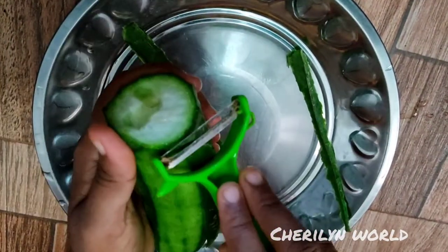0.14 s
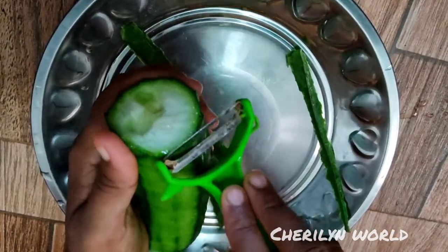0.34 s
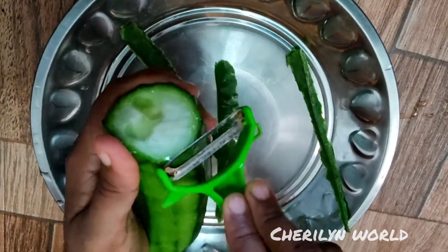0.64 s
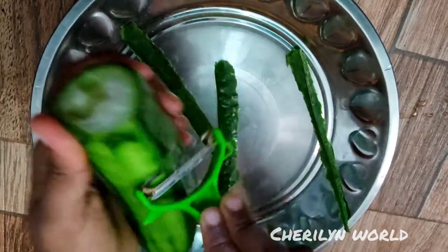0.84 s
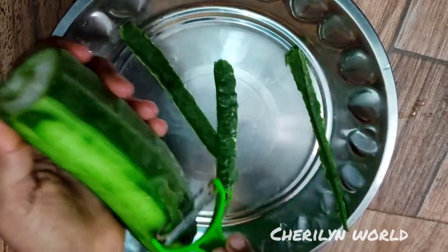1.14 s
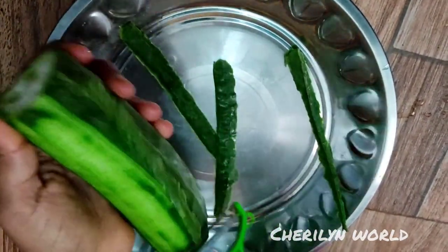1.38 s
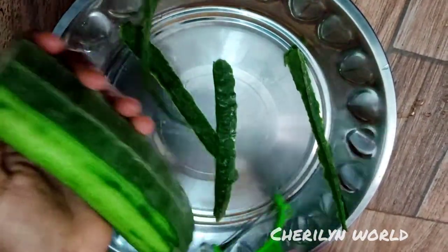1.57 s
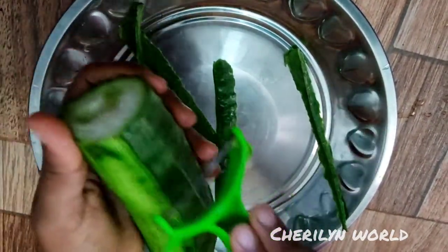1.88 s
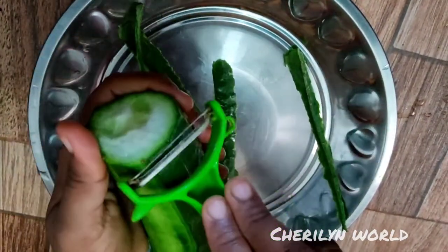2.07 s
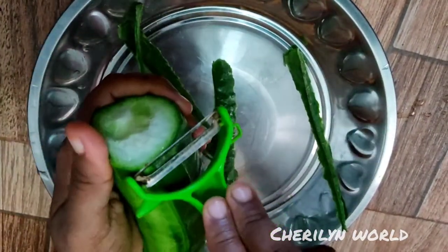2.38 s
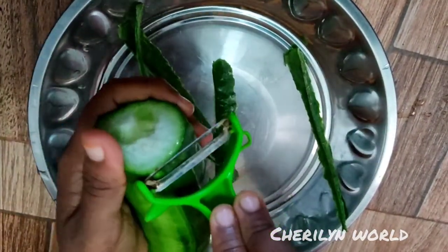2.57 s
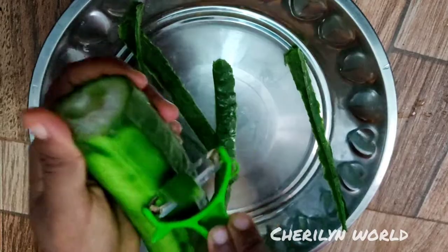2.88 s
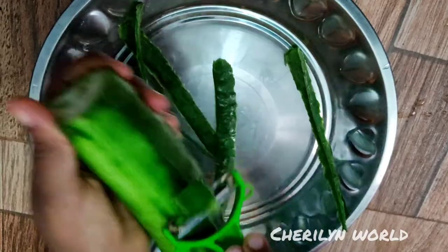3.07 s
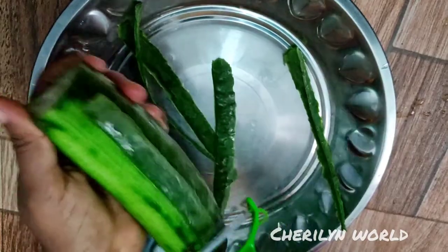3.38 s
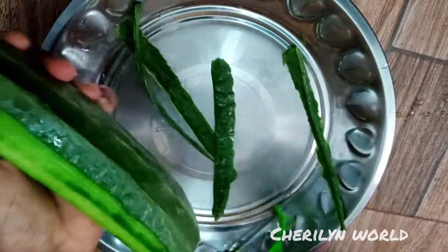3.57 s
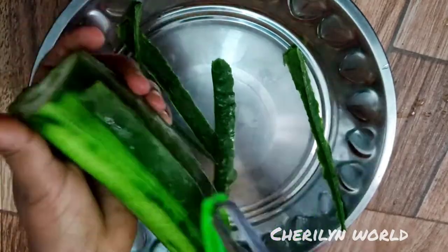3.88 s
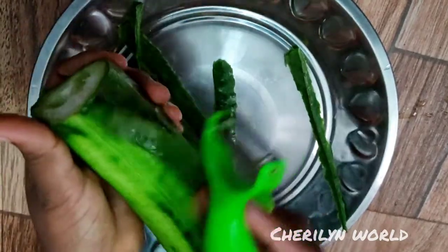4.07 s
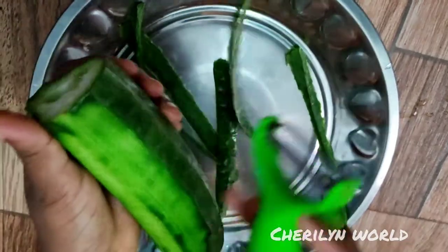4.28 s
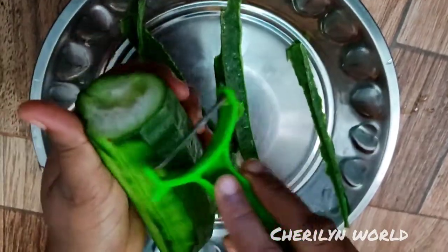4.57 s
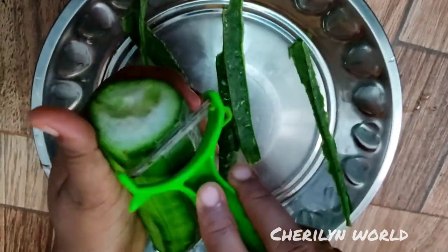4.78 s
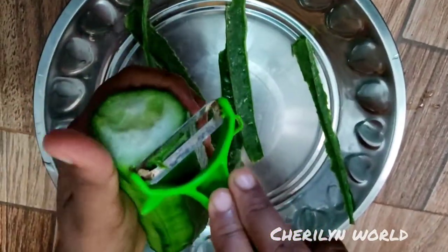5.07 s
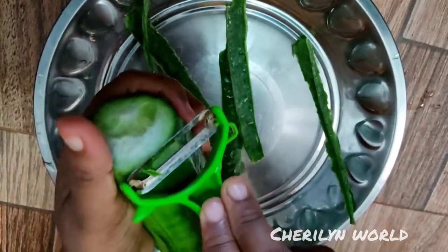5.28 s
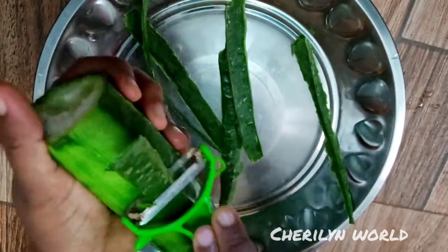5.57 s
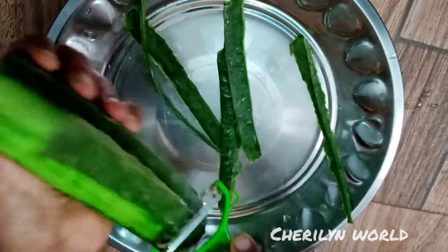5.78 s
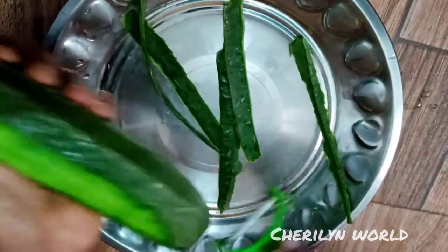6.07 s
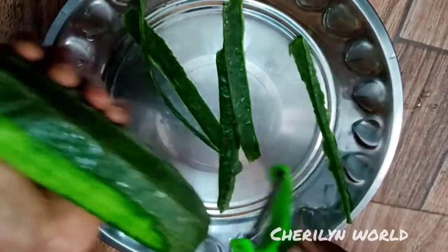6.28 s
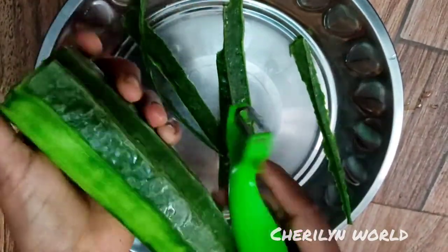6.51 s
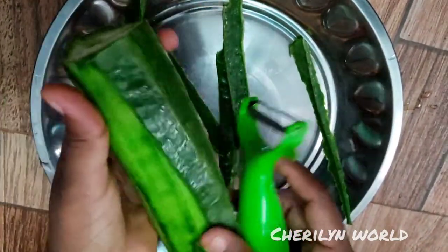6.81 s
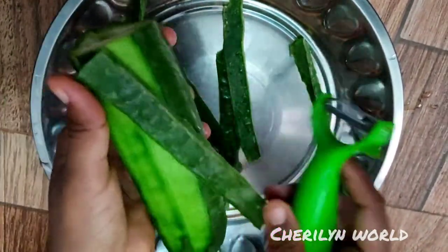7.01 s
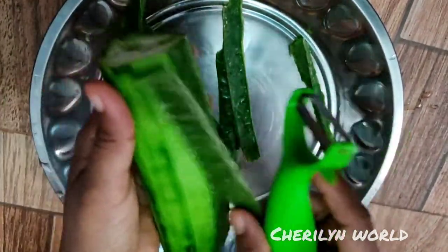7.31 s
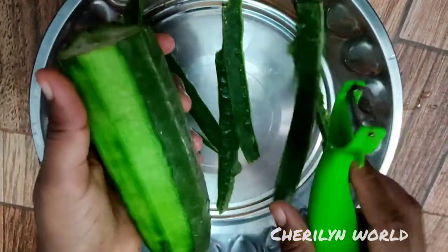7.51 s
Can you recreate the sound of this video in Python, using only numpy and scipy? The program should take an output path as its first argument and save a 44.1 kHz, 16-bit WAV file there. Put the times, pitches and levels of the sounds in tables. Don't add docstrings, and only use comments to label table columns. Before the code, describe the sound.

A peeler tears wet, crisp skin off a hollow gourd in short hissing strokes, with two sharp metallic snaps, in a quiet hard-walled kitchen.

```python
import sys
import numpy as np
from scipy import signal
from scipy.fft import rfft, irfft, next_fast_len
from scipy.io import wavfile
from scipy.ndimage import uniform_filter1d, map_coordinates

SR = 44100
rng = np.random.default_rng(int(sys.argv[2]) if len(sys.argv) > 2 else 0)


def amplitude_ratio(level_db):
    exponent = np.asarray(level_db, float) / 20
    return 10 ** exponent


def wav_record(signal):
    frames = np.transpose(np.atleast_2d(signal))
    bounded = np.clip(frames, -1, 1)
    quanta = np.round(bounded * 32767).astype(np.int16)
    wavfile.write(sys.argv[1], SR, quanta)


N = 337365


def unit(x):
    return x / np.sqrt(np.mean(x ** 2) + 1e-20)


def along(points, hz):
    f, v = np.transpose(points)
    return np.interp(np.log(hz + 1), np.log(f + 1), v)


def filtered(x, response):
    m = next_fast_len(x.shape[-1] + 8192)
    spectrum = rfft(x, m) * response(np.fft.rfftfreq(m, 1 / SR))
    return irfft(spectrum, m)[..., :x.shape[-1]]


def wobble(rate):
    knots = rng.standard_normal(int(N * rate / SR) + 4)
    return map_coordinates(knots, [np.arange(N) * rate / SR])


def pair(a, b, alike):
    lag_s = 0.00017

    def lag(hz):
        return np.exp(-1j * np.pi * hz * lag_s * np.array([[1], [-1]]))

    def shares(hz):
        angle = np.arccos(np.clip(alike(hz), 0, 1)) / 2
        return np.array([np.cos(angle), np.sin(angle)])

    mid, side = filtered(np.array([a, b]), shares)
    return filtered(np.array([mid + side, mid - side]), lag)


def air():
    # time_s, level_db
    room_level = [(0, -46), (1.4, -45), (3.2, -45.5), (4.2, -47), (5.5, -46), (7.65, -45.5)]
    # frequency_hz, level_db
    fan_colour = [(40, -12), (65, -12), (135, -13), (170, -3.5), (300, -4), (350, -5), (600, -1.5),
                  (720, -2), (950, -9.5), (1150, -5), (1500, -10.5), (2400, -16), (4200, -26.5),
                  (16000, -33)]
    # frequency_hz, likeness_0_to_1
    likeness = [(30, 0.45), (130, 0.89), (400, 0.85), (1000, 0.51), (1400, 0.12), (2500, 0.26),
                (5000, 0.03)]
    # pitch_hz, width_hz, level_db, on_s, off_s
    motors = [
        (58.6, 1.6, -65.5, 0, 2.1),
        (94.8, 1.2, -72.5, 2.2, 5),
        (177.2, 11.8, -60.5, -1.5, 9),
    ]
    t = np.arange(N) / SR
    wash = pair(*rng.standard_normal((2, N)), lambda hz: along(likeness, hz))
    wash = unit(filtered(wash, lambda hz: amplitude_ratio(along(fan_colour, hz))))
    drift_db = 0.4 * wobble(5)
    out = amplitude_ratio(np.interp(t, *np.transpose(room_level)) + 1.5 + drift_db) * wash
    for pitch_hz, width_hz, db, on, off in motors:
        noise = rng.standard_normal(N)
        hum = unit(filtered(noise, lambda hz: np.exp(-((hz - pitch_hz) / width_hz) ** 2)))
        out += amplitude_ratio(db) * hum / (1 + np.exp((on - t) / 0.08)) / (1 + np.exp((t - off) / 0.08))
    return out


def room(x, wet_db):
    # frequency_hz, t60_s
    kitchen = [(500, 0.19), (2000, 0.34), (6000, 0.35), (12000, 0.24)]
    hz, t, z = signal.stft(rng.standard_normal((2, SR // 3)), SR, nperseg=256)
    fade = amplitude_ratio(-60 * t / along(kitchen, hz)[:, None])
    tail = signal.istft(z * fade, SR, nperseg=256)[1]
    tail = np.pad(tail / np.linalg.norm(tail[0]), ((0, 0), (130, 0)))
    return x + amplitude_ratio(wet_db) * signal.fftconvolve(x, tail, axes=1)[:, :x.shape[1]]


def hit(db, knock_db, knock_hz, lr_db, t60, modes, ring_db, wet_db, rise_s):
    # frequency_hz, level_db
    breaking = [(400, -14.5), (1000, -7), (2500, -0.5), (5000, -3.5), (7000, 0), (9500, 1.5), (12000, -2),
                (16000, -10)]
    # frequency_hz, level_db
    soft_body = [(600, -43), (1200, -17), (2000, -0.5), (3500, 0), (5500, -12.5), (8000, -27)]
    echoed = 0.66
    t = np.arange(SR // 3) / SR
    rise = 1 - np.exp(-t / rise_s)
    blow = amplitude_ratio(-60 * t / max(t60, 0.002)) * rise
    noise = filtered(rng.standard_normal((2, len(t))), lambda hz: amplitude_ratio(along(breaking, hz)))
    body = filtered(rng.standard_normal((2, len(t))), lambda hz: amplitude_ratio(along(soft_body, hz)))
    burst = blow * (unit(noise) + amplitude_ratio(min(knock_db, 0) + 1.5) * unit(body))
    crack = pair(*burst, lambda hz: 0.5 + 0 * hz)
    thud = amplitude_ratio(knock_db + 9 - 60 * t / 0.022) * np.sin(2 * np.pi * knock_hz * t) * rise
    ring = pair(thud, 0 * t, lambda hz: 1 + 0 * hz)
    for hz, level_db, ring_s in modes:
        phase = rng.uniform(0, 2 * np.pi, (2, 1))
        fading = amplitude_ratio(ring_db + level_db - 60 * t / ring_s) * (1 - np.exp(-t / 0.00027))
        ring += fading * np.sin(2 * np.pi * hz * t + phase)
    lean = amplitude_ratio([[lr_db / 2], [-lr_db / 2]])
    return amplitude_ratio(db - 8.0) * lean * (room(crack + echoed * ring, wet_db) + (1 - echoed) * ring)


def contacts():
    # start_s, peak_db, knock_db re peak, knock_hz, contact_t60_s
    snaps = [
        (0.5084, -4, -10, 1980, 0.059),
        (7.5828, -1.5, -15, 2480, 0.014),
    ]
    # pitch_hz, level_db, t60_s
    blade_modes = [(1130, -4.5, 0.056), (1320, -12, .03), (1944, 5, 0.028), (2780, -13, 0.016),
                   (3320, -4.5, 0.033), (4000, -5, 0.029), (4610, -2, 0.036), (5470, -14, .02),
                   (7560, -7, 0.027)]
    # pitch_hz, level_db, t60_s
    hinge_modes = [(1150, 0, 0.024), (2510, -12, 0.018), (3170, -9.5, 0.022), (3830, -16, 0.021),
                   (4670, -11, .02), (7740, 10.5, 0.0093)]
    # start_s, peak_db, knock_db re peak, knock_hz, left_right_db
    bounces = [
        (0.5062, -13, -32, 2100, -13),
        (0.5124, -8.5, -11, 1960, -3),
        (0.5181, -14, -6, 1130, -3),
        (0.5223, -8, -11.5, 1340, -4),
        (7.5795, -24, -20, 1200, -5),
        (7.5855, -9.5, -10.5, 1200, -4.5),
        (7.592, -12, -12, 1200, 0),
    ]
    # start_s, peak_db, knock_db re peak, knock_hz, left_right_db
    ticks = [(0.4274, -35.5, 11.5, 1196, -3), (1.3734, -35, -12, 960, -2), (1.4132, -42, -19, 945, 0),
             (1.5697, -30, -5, 1290, -1), (1.6464, -37, -6, 1320, -3), (1.8731, -31, -15, 1200, 1),
             (2.2403, -35, -5, 1270, -2), (3.3802, -31, -8, 953, 2), (3.4394, -21.5, -15, 1020, 5),
             (3.4513, -23, -18, 920, 5), (4.2774, -23, -5, 1150, -4), (4.299, -41, 4, 1290, 6),
             (4.4024, -37.5, -11, 1290, 0), (5.2839, -39, -13, 990, -2), (6.003, -36, -11, 1120, -4),
             (6.0415, -26, -17, 1130, 0), (6.071, -28, -12, 940, 0), (6.5515, -45, -6, 1180, 0),
             (6.6593, -42, -8, 1070, -7), (7.5218, -41, -6, 1170, 0), (7.5457, -33, -3, 1150, -3)]
    snap_lean_db = 3.5
    snap_rise_s, tick_rise_s = 0.00071, 0.0014
    bounce_t60_s, tick_t60_s = 0.04, 0.034
    first, second = [(*row[:-1], snap_lean_db, row[-1]) for row in snaps]
    sounds = [(first, blade_modes, -6, -7, snap_rise_s), (second, hinge_modes, -10, -9, snap_rise_s)]
    sounds += [((*row, bounce_t60_s), [], 0, -7, snap_rise_s) for row in bounces]
    sounds += [((*row, tick_t60_s), [], 0, -6, tick_rise_s) for row in ticks]
    out = np.zeros((2, N + SR))
    for (s, *blow), *voice in sounds:
        out[:, round(s * SR):][:, :SR // 3] += hit(*blow, *voice)
    return out[:, :N]


def flesh(hz):
    # pitch_hz, width_hz, level_db
    hollow = [(857, 130, 2), (1200, 400, 0.5), (2160, 335, 4.5), (3360, 460, -19)]
    total = 0
    for k, (c, w, db) in enumerate(hollow):
        total = total + (-1) ** k * amplitude_ratio(db) * 1j * hz * w / (c * c - hz * hz + 1j * hz * w)
    return total


def fibres(spread_db):
    clump = unit(uniform_filter1d(rng.standard_normal(N), size=40))
    return unit(rng.standard_normal(N) * amplitude_ratio(spread_db * clump))


def strokes():
    # full_bite_s, hold_s, tearing_db, attack_s, release_s
    pulls = [
        (0.78, 0.13, -45.5, 0.039, 0.11),
        (1.088, .12, -45, .04, .06),
        (1.404, 0.014, -42, 0.067, .025),
        (2.774, 0.12, -42.5, .03, .03),
        (3.049, 0.1, -41.5, 0.041, 0.086),
        (3.378, 0.073, -41, .025, 0.018),
        (5.434, 0.11, -42.5, 0.046, 0.05),
        (5.711, .1, -39, 0.12, .04),
        (6, 0.027, -51, 0.022, .01),
        (6.041, 0.033, -40.5, .005, 0.011),
    ]
    # frequency_hz, level_db
    skin = [(500, -67), (1000, -19.5), (3000, 2), (4800, -3), (5800, 2.5), (7000, 5.5), (10000, 5.5),
            (16000, 1.5)]
    edge_db = 21.5
    sag_db_per_s = 5
    body_db, deepens_db_per_s = -11, 24
    lean_db, sweep_db_per_s = -2.5, -8
    t = np.arange(N) / SR
    tear, body, lean = np.zeros((3, N))
    for s, hold, db, attack, release in pulls:
        pulled = np.clip(t - s, 0, hold)
        away = np.maximum(s - t, 0) / attack + np.maximum(t - s - hold, 0) / release
        bite = amplitude_ratio(db - edge_db * away - sag_db_per_s * pulled)
        tear += bite
        body += bite * amplitude_ratio(body_db + deepens_db_per_s * pulled)
        lean += bite * (lean_db + sweep_db_per_s * pulled)
    pan_db = lean / (tear + 1e-9)
    ridges = amplitude_ratio(1.4 * wobble(60) + 1.7 * wobble(20))
    hiss = pair(fibres(1.7), fibres(2.1), lambda hz: 0.65 + 0 * hz)
    hiss = amplitude_ratio(1.5) * tear * unit(filtered(hiss, lambda hz: amplitude_ratio(along(skin, hz))))
    rumble = pair(fibres(2.1), fibres(3.8), lambda hz: 0.5 + 0 * hz)
    rumble = amplitude_ratio(4.5) * body * unit(filtered(rumble, flesh))
    return ridges * (hiss * amplitude_ratio(0.38 * pan_db * [[1], [-1]]) + rumble)


def notes():
    # centre_s, length_s, pitch_hz, peak_db
    squeezes = [(1.399, 0.011, 950, -38), (1.625, .006, 1250, -37), (1.655, .014, 1120, -38),
                (1.655, 0.013, 1310, -37.5), (3.416, .02, 950, -43), (3.436, .014, 980, -42),
                (3.453, .014, 880, -42), (4.289, .006, 1150, -41), (5.775, .05, 900, -45.5),
                (6.077, 0.013, 930, -45), (7.552, .009, 1150, -33.5), (6.553, .006, 1180, -40)]
    t = np.arange(N) / SR
    tone = np.zeros(N)
    for s, length, hz, db in squeezes:
        swell = np.exp(-(2 * (t - s) / length) ** 2)
        tone += amplitude_ratio(db) * swell * np.sin(2 * np.pi * hz * t)
    return pair(tone, 0 * t, lambda hz: 1 + 0 * hz)


def fingers():
    # centre_s, length_s, level_db
    brushes = [(3.87, .04, -67), (3.96, .03, -61), (4.119, 0.04, -54.5), (4.45, .08, -65),
               (4.928, 0.034, -66), (5.25, 0.094, -67), (6.568, 0.037, -64), (6.75, 0.056, -63),
               (6.97, .04, -70), (6.879, 0.064, -56.5), (7.347, 0.032, -61), (7.486, .04, -63)]
    # frequency_hz, level_db
    rustle_colour = [(2000, -30), (5000, -7), (8000, -4.5), (11000, -2), (16000, 1.5)]
    t = np.arange(N) / SR
    touch = sum(amplitude_ratio(db) * np.exp(-(2 * (t - s) / length) ** 2) for s, length, db in brushes)
    rustle = np.array([fibres(2.5), fibres(2.1)])
    rustle = filtered(rustle, lambda hz: amplitude_ratio(along(rustle_colour, hz)))
    return amplitude_ratio(6.5) * touch * unit(rustle)


def scene():
    return room(strokes() + fingers() + notes(), wet_db=-7.5) + contacts() + air()


def causal(points):
    cepstrum = irfft(np.log(amplitude_ratio(along(points, np.fft.rfftfreq(1024, 1 / SR)))))
    cepstrum[1:512] *= 2
    cepstrum[513:] = 0
    return irfft(np.exp(rfft(cepstrum)))


def chance(shape, frames):
    draw = rng.standard_normal((shape[0] // 8 + 1, shape[1]))
    draw = unit(uniform_filter1d(draw, size=frames, axis=1))
    return np.repeat(draw, 8, axis=0)[:shape[0]]


def thinned(x):
    weakest_kept = ([700, 1200, 2000, 3000, 4200, 6000, 7500, 9000, 9800, 10500, 11400, 12500, 14000,
                    16000], [-50, -25, -14, -15, -13, -12, -11, -14, -11, -12, -15, -20, -17, -12])
    window = np.sin(np.pi * (np.arange(2048) + 0.5) / 2048)
    frame = dict(window=window, nperseg=2048, noverlap=1024)
    hz, _, z = signal.stft(x, SR, **frame)
    bright = z[:, (hz > 5500) & (hz < 9500)]
    bright_db = 10 * np.log10(np.mean(abs(bright) ** 2, axis=(0, 1)) + 1e-20)
    steady = bright_db - np.roll(bright_db, 2) < 22
    busy_db = np.clip(bright_db - np.median(bright_db), 0, 25)
    greed = np.where(hz < 11500, 0.3, -0.3)[:, None]
    luck_db = 5 * chance(z.shape[1:], frames=4)
    floor = amplitude_ratio(bright_db + greed * busy_db + np.interp(hz, *weakest_kept)[:, None] + luck_db)
    coarse = busy_db * (busy_db < 19) * steady * (hz > 1500)[:, None]
    coarse_db = 0.17 * coarse * chance(z.shape[1:], frames=2)
    kept = z * amplitude_ratio(coarse_db) * (abs(z) > floor * steady)
    return signal.istft(kept, SR, **frame)[1][:, :N]


def roll_off(x):
    return signal.sosfilt(signal.butter(12, 16810, fs=SR, output="sos"), x)


def record(dry):
    # frequency_hz, level_db
    port_colours = [
        [(100, 3), (1500, 1), (4000, 2.5), (7500, 3.5), (9100, 7.5), (9700, -3), (10500, -11), (11500, -15), (15000, -11), (16000, -44), (17000, -87)],
        [(100, -2), (1500, -1.5), (4000, 1.5), (6200, 2.5), (7500, 11), (8600, 0.2), (10000, -7), (11500, -14.5), (15000, -14), (16000, -30), (17000, -90)],
    ]
    heard = np.array([signal.fftconvolve(x, causal(port))[:N] for x, port in zip(dry, port_colours)])
    heard /= (1 + abs(heard / 0.95) ** 6) ** (1 / 6)
    mix = thinned(heard)
    return roll_off(mix)


dry = scene()
out = record(dry)
wav_record(out)
```